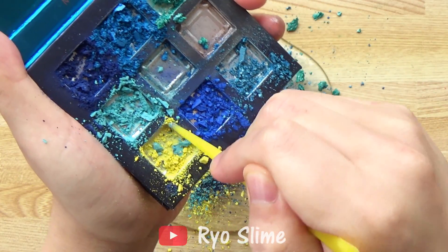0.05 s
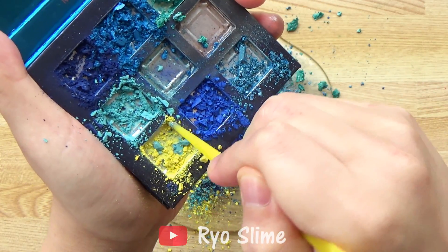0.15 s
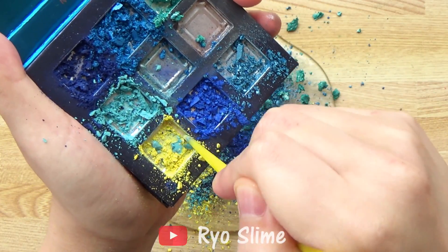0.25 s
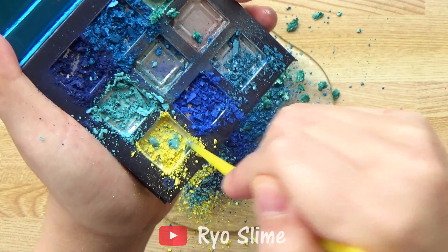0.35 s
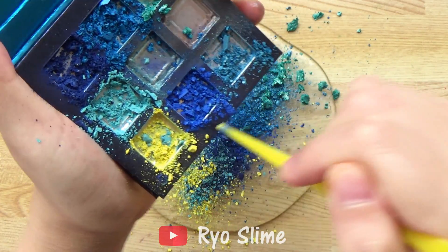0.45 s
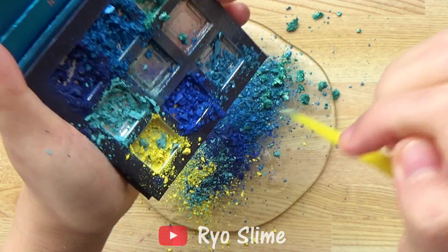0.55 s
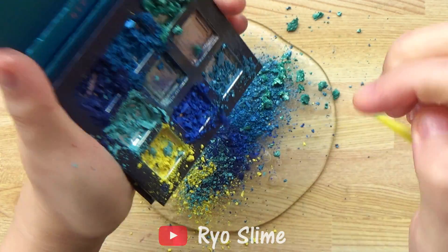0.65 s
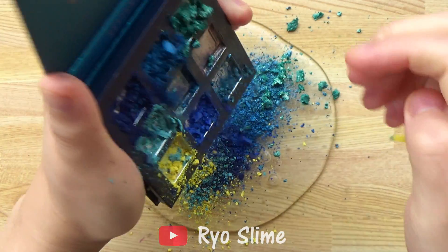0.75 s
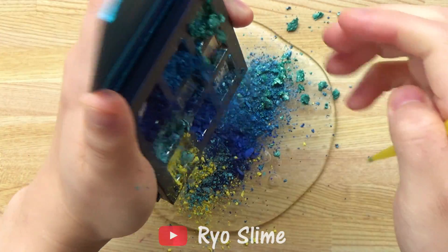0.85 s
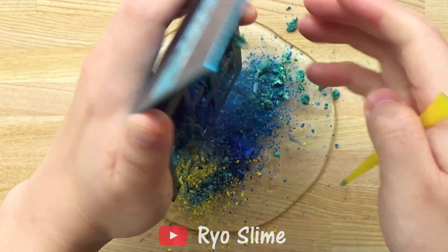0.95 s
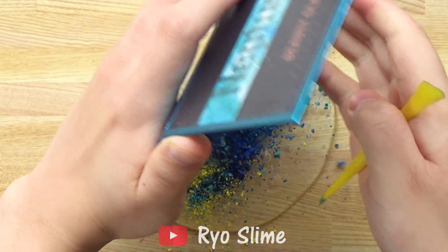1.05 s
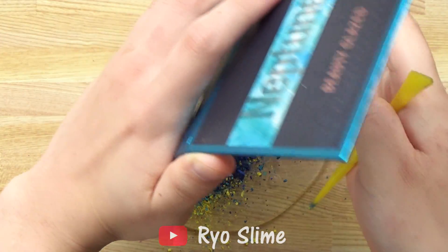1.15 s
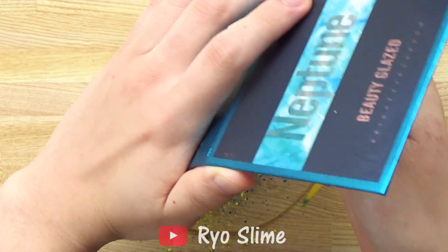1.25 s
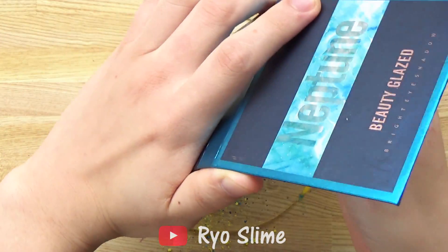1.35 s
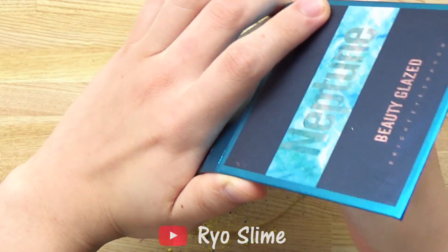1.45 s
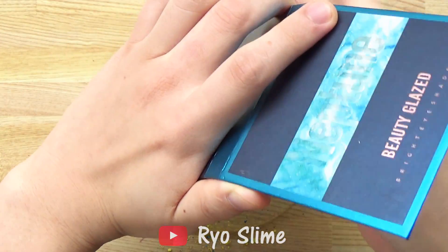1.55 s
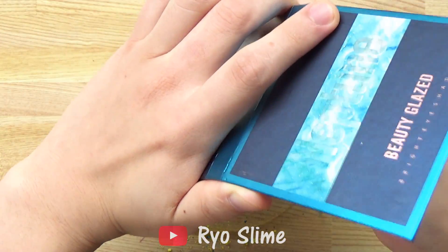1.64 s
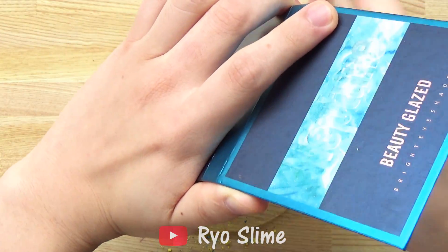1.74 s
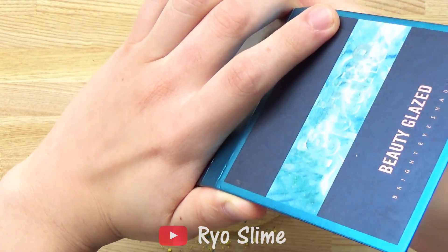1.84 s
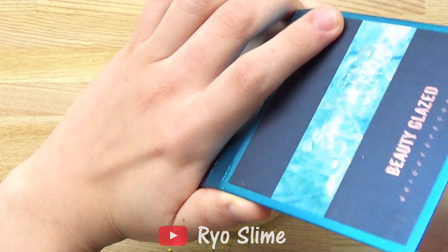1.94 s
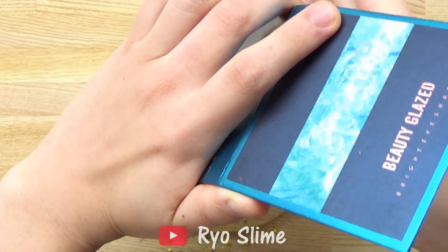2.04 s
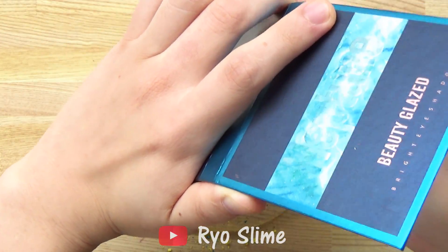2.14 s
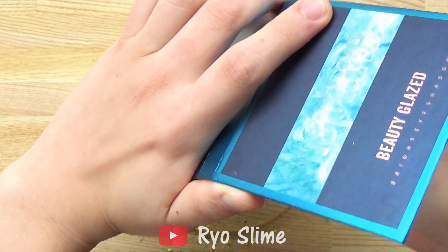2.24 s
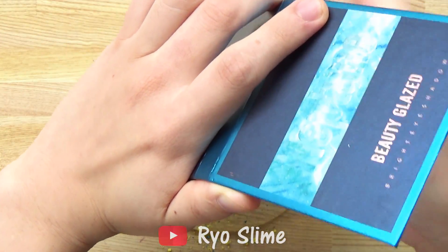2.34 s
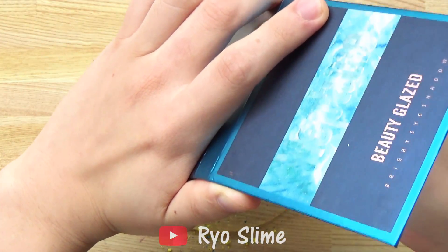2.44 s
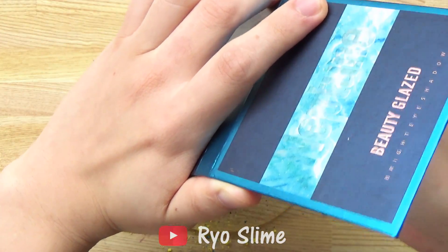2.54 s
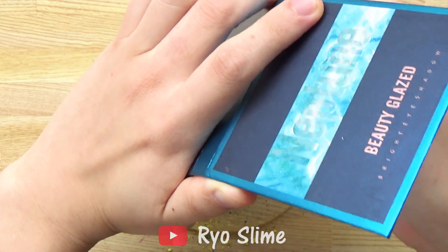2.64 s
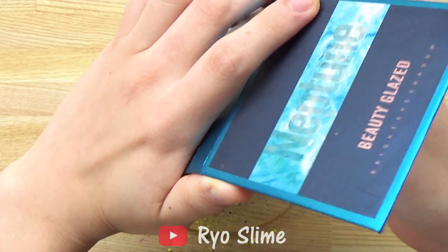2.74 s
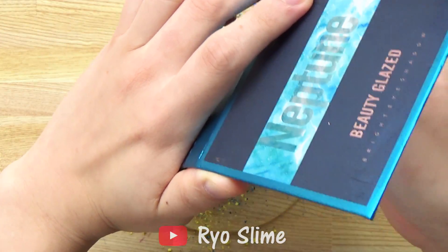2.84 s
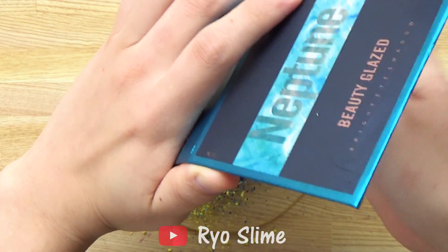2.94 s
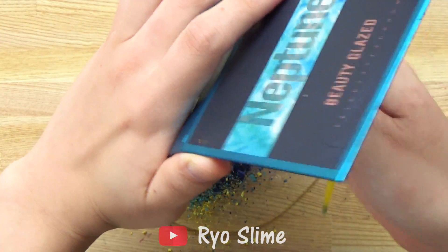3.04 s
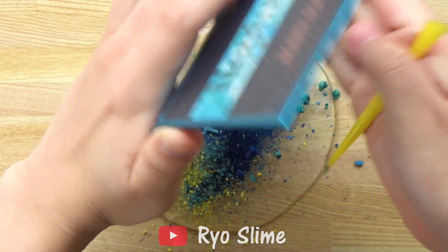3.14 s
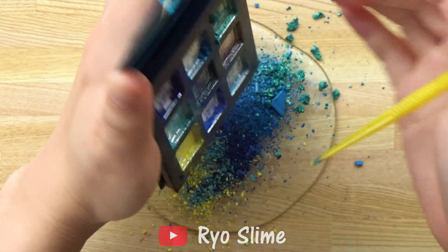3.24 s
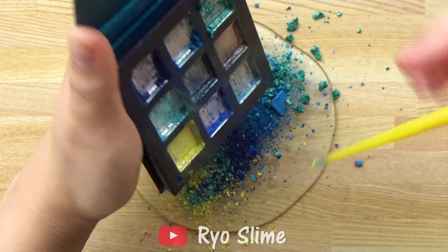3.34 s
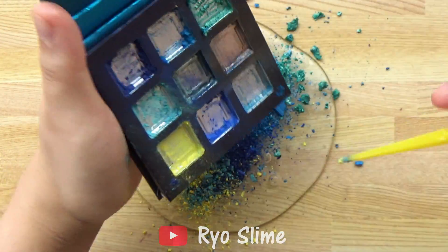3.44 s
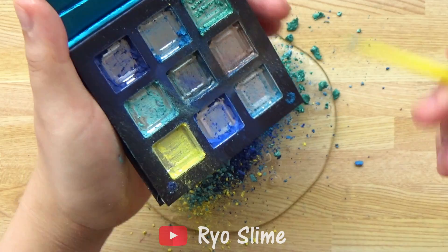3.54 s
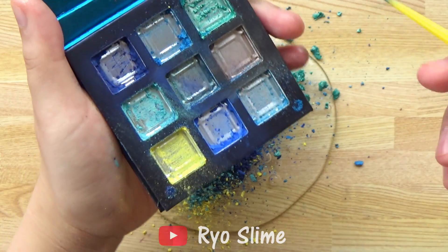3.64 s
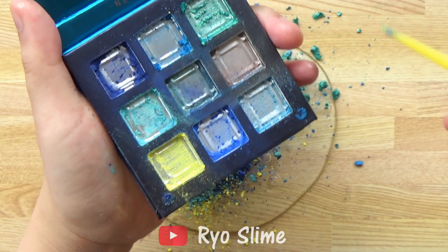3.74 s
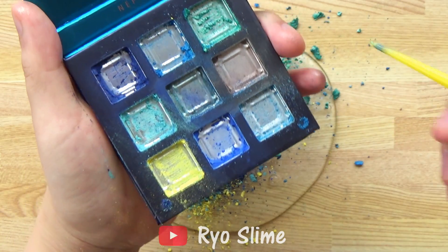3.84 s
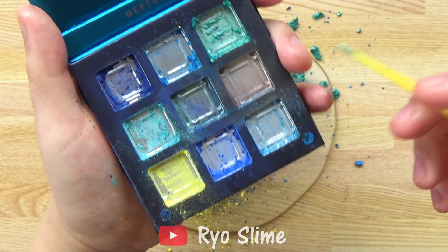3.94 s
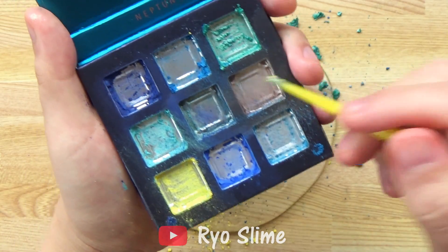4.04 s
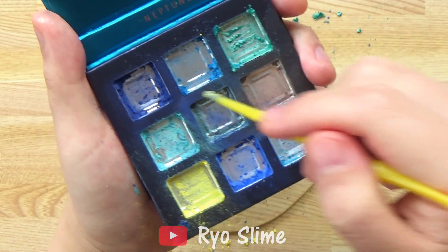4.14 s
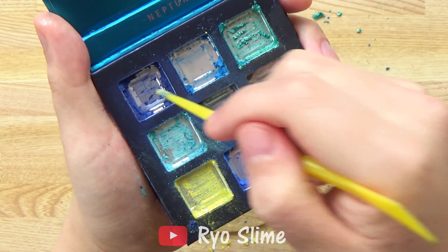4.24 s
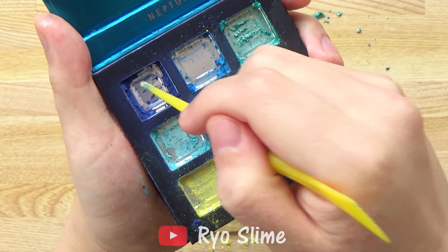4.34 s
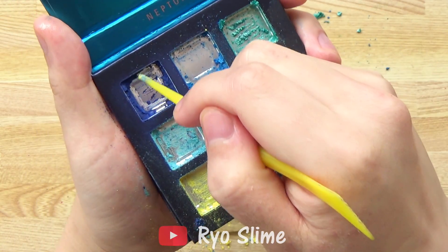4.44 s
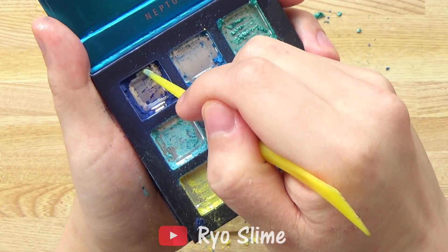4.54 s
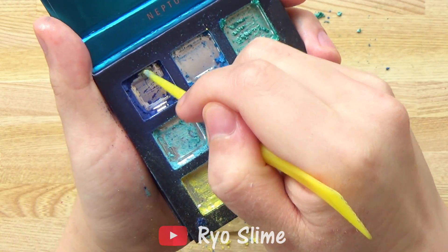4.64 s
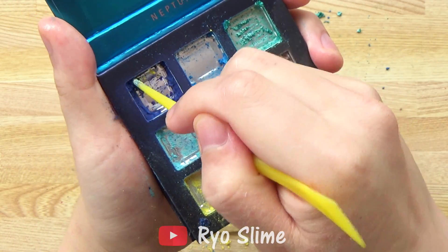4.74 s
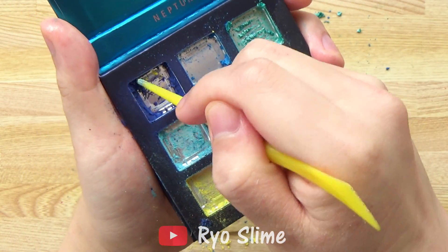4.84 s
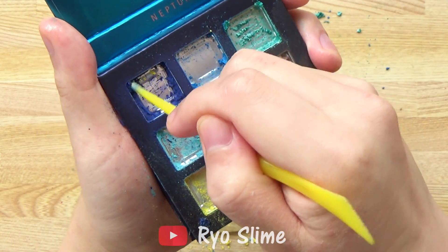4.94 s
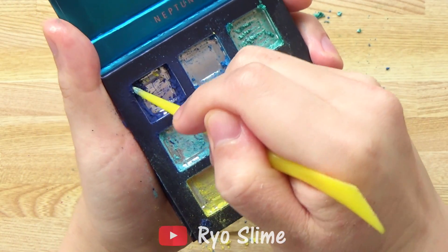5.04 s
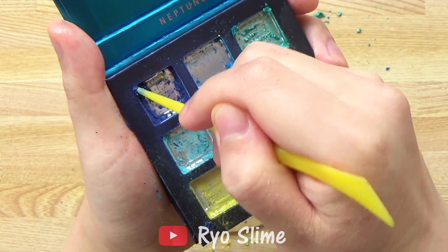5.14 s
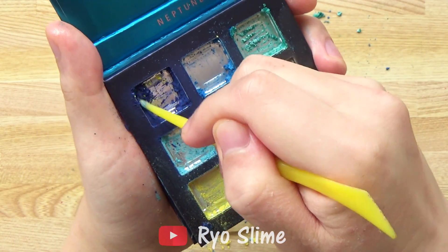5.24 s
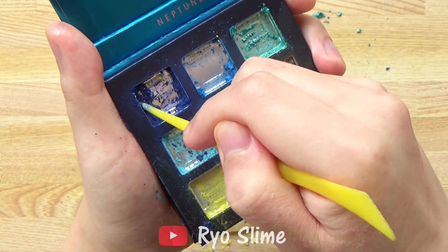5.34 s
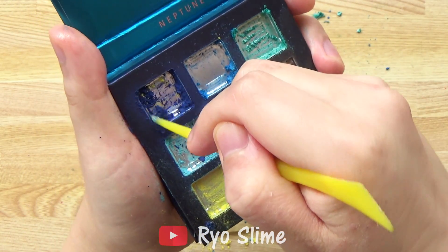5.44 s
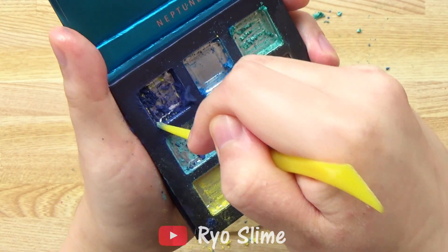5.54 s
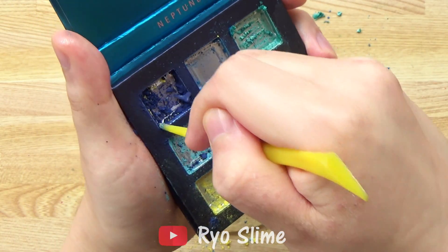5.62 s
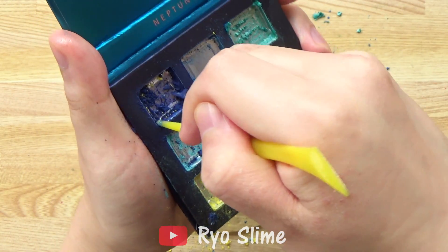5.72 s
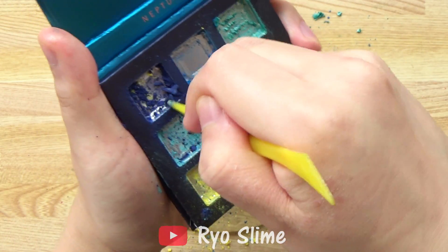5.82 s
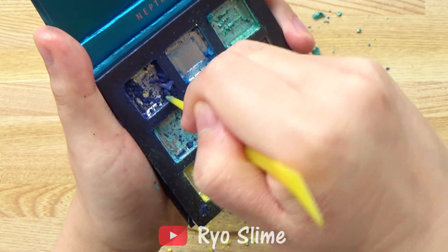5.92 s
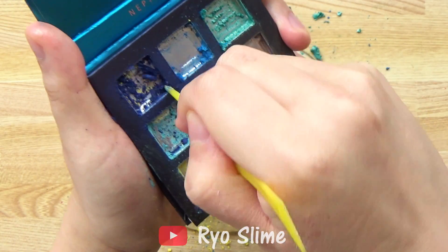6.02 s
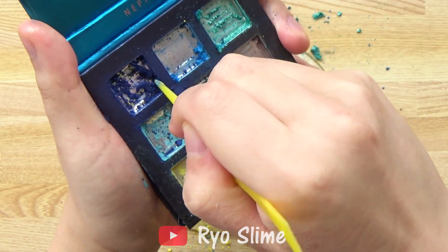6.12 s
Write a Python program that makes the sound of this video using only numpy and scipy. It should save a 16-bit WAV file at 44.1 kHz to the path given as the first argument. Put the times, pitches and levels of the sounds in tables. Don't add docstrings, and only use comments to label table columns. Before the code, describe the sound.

Very close stereo, quiet room with low handling rumble. A thin plastic pick scrapes and snaps pressed powder and flicks the tray. The case is swung over and slapped about eleven times in quick regular rhythm, soft at first, then loud, each crack followed by a short hiss of crumbs. Near silence follows, with faint skin rubbing, then dull thuds, a brief rattling metal pan knock, and gritty digging ending in hard snaps.

```python
import sys
import numpy as np
from scipy import signal
from scipy.fft import rfft, irfft, next_fast_len
from scipy.io import wavfile
from scipy.ndimage import uniform_filter1d

SR = 44100
rng = np.random.default_rng(int(sys.argv[2]) if len(sys.argv) > 2 else 0)


def materialize(psi):
    bounded = np.clip(np.atleast_2d(psi).T, -1, 1)
    quanta = np.round(bounded * 32767).astype(np.int16)
    wavfile.write(sys.argv[1], SR, quanta)


def natural_amplitude(level_db):
    exponent = np.asarray(level_db, float) / 20
    return 10 ** exponent


N = 272538

# (time [s], peak [dB], bright part over peak [dB], push [dB], crumbs shaken out [dB])
SLAPS = [(1.5163, -16, -16, -32, -36.5), (1.659, -21, -8.5, -28.5, -35.5),
         (1.8083, -26, -14.5, -29.5, -36.5), (1.9615, -7.5, -5, -21, -38), (2.117, -4.5, -8, -22, -38),
         (2.2717, -3, -3.5, -21.5, -34), (2.43, 1, -10, -21.5, -36), (2.5775, 1.5, -10, -21, -34),
         (2.7325, -6, -2.5, -20, -31.5), (2.8968, -6, -5, -22, -34.5), (3.0535, -9.5, -5, -19.5, -42.5)]
# (time [s], peak [dB], bright part over peak [dB])
LATE_FINGERS = [
    (1.816, -18, -12),
    (1.985, -31, -5.5),
    (2.147, -21, -14),
    (2.291, -31.5, -3),
    (2.737, -16, -4),
    (2.757, -30, 3),
    (3.089, -32, 2),
]
# (frequency [Hz], width [Hz], level [dB])
SLAP_BODY = [(380, 110, -3), (730, 73, 1), (1276, 180, 1.5), (1834, 180, -0.5), (2913, 400, -5),
             (3790, 1300, -15)]
# (frequency [Hz], width [Hz], level [dB])
SLAP_EDGE = [(4720, 880, -11), (6750, 450, -3.5), (7850, 570, 2.5), (9270, 980, 3.5), (11900, 1900, -9.5),
             (13500, 1500, -10)]
SLAP_LOW_DB = [5, 5, 6, 4, 4, 2, 9, 1, 11, 15, 4]
# (second [dB], third [dB], fourth [dB], fifth [dB], sixth [dB])
SLAP_SPOTS = [(5.0, -1.0, 6.0, 3.0, -1.0), (4.0, -5.0, -6.0, -3.0, 11.0), (5.0, 4.0, 7.0, -1.0, 1.0),
              (6.0, -3.0, 2.0, 1.0, 2.0), (3.0, 2.0, -0.0, -2.0, 4.0), (4.0, -2.0, -1.0, 1.0, 3.0),
              (1.0, -2.0, 4.0, 1.0, -4.0), (0.0, -3.0, -1.0, 2.0, 5.0), (3.0, 4.0, 3.0, 1.0, 2.0),
              (4.0, -4.0, 2.0, 2.0, 7.0), (-7.0, 3.0, 0.0, 1.0, -5.0)]
# (lowest [dB], second [dB], third [dB], fourth [dB], upper ones [dB])
SLAP_EDGE_SPOTS = [(-2.0, 0.0, -7.0, -7.0, 5.0), (-2.0, 14.0, 1.0, 3.0, 1.0), (10.0, 10.0, 5.0, 3.0, 7.0),
                   (2.0, 6.0, 4.0, -3.0, 9.0), (1.0, 3.0, 2.0, 7.0, 5.0), (1.0, 5.0, 2.0, 2.0, -0.0),
                   (6.0, 4.0, -2.0, 4.0, 8.0), (6.0, 6.0, -2.0, -4.0, 5.0), (2.0, 6.0, 4.0, -0.0, 4.0),
                   (11.0, 10.0, 1.0, -1.0, -2.0), (1.0, 1.0, -2.0, 4.0, -1.0)]
# (lead [s], frequency [Hz], t60 [s], signed size [1])
SLAP_MID = [(.07, 15, .3, .14), (-.0003, 230, .014, .85), (-.0003, 74, .06, .95)]
# (lead [s], frequency [Hz], t60 [s], signed size [1])
SLAP_SIDE = [(.045, 8, .5, .26), (-.0012, 44, .085, 1.25), (-.03, 26, .2, -.18)]
# (lead [s], frequency [Hz], t60 [s], signed size [1])
SWING_MID = [(0.0347, 28, .12, -0.91), (0.011, 49, 0.089, 0.74)]
# (lead [s], frequency [Hz], t60 [s], signed size [1])
SWING_SIDE = [(.03, 22, .14, 1.3)]
# (frequency [Hz], width [Hz])
TABLE_NULLS = [(540, 170), (1010, 80), (2150, 110)]
# (frequency [Hz], density [dB per Hz])
DULL_TAIL = [(120, -16), (200, -8.5), (281, 6.5), (454, -3.5), (646, -2), (849, -6.5), (1160, -5),
             (2170, -12), (4500, -36.5), (5850, -51.5), (9900, -120)]
# (frequency [Hz], density [dB per Hz])
CRUMB_TAIL = [(1760, -33.5), (3000, -10.5), (3590, -8.5), (4980, -7.5), (5460, -8), (7800, 1.5),
              (10400, -2.5), (12400, -10), (15000, -17.5), (16000, -27), (16500, -61.5)]

# (time [s], peak [dB], bright part over peak [dB], push [dB], powder [dB])
SNAPS = [
    (0.067, -26.5, -27, -27.5, -49),
    (0.2236, -10.5, -32, -28.5, -47),
    (5.244, -24, -33, -30, -40),
    (5.5212, -5.5, -31, -22, -45),
    (5.7968, -4.5, -24, -12.5, -42),
    (5.8338, -13, -22, -35, -36),
    (6.0042, -3, -40, -19, -36),
    (6.0063, -8, -30, -24, -45),
    (6.11, -12.5, -30, -25.5, -46),
    (6.12, -14, -28, -36.5, -46),
]
# (time [s], peak [dB], bright part over peak [dB], powder [dB])
TICKS = [(0.0055, -33, -11, -47), (0.493, -39, -13, -62), (0.5535, -27, -25, -60), (.807, -36, -25, -65),
         (0.828, -35, -14, -56), (.854, -32, -25, -64), (0.8765, -20, -22, -62), (.905, -33, -28, -64),
         (.92, -27, -28, -62), (.932, -32, -22, -64), (.951, -27, -28, -58), (0.9615, -11, -18.5, -42),
         (0.964, -3, -22, -42), (1.002, -27, -25, -58), (1.051, -33.5, -7, -50), (1.104, -30, -28, -60),
         (1.126, -23, -18, -62), (1.135, -24, -25, -62), (1.161, -25.5, -16, -67), (1.209, -26, -16, -46),
         (3.738, -39, -28, -68.5), (3.847, -30, -20, -66), (4.6935, -16, -18, -48), (5.272, -27, -10, -49),
         (5.328, -29, -1, -48), (5.5525, -24, -22, -49), (5.563, -11, -12, -46), (5.7188, -19, -32, -60)]
# (time [s], peak [dB], push [dB])
THUDS = [(4.025, -31, -29.5), (4.056, -39, -34), (4.082, -35.5, -37), (4.145, -32, -32), (4.253, -32, -31),
         (4.552, -31.5, -34), (4.606, -19.5, -38), (4.897, -14.5, -48), (4.969, -33.5, -40),
         (5.118, -22.5, -34.5), (5.437, -25, -39), (5.461, -28.5, -31.5), (5.467, -20, -28.5),
         (5.5203, -7, -36)]
# (frequency [Hz], width [Hz], level [dB])
TICK_BODY = [(785, 67, -3), (1480, 300, -3.5), (1830, 200, -1), (2220, 270, -15.5), (3040, 380, -10.5)]
# (frequency [Hz], width [Hz], level [dB])
SNAP_BODY = [(611, 130, 1.5), (1124, 380, -3), (1837, 270, -1), (2380, 220, -7.5), (2930, 120, -26),
             (3890, 1200, -20)]
# (frequency [Hz], width [Hz], level [dB])
THUD_BODY = [(208, 150, -2.5), (400, 200, 0), (592, 230, 0), (990, 340, -2), (1335, 400, -11),
             (1880, 140, -15)]
# (frequency [Hz], width [Hz], level [dB])
PICK_EDGE = [(4500, 1600, -1), (6700, 1400, 2.5), (7930, 1100, 0.5), (11000, 4000, -17)]
# (lowest [dB], second [dB], third [dB], upper ones [dB])
TICK_SPOTS = [(-6.0, -3.0, -5.0, 15.0), (9.0, -5.0, -5.0, 7.0), (-3.0, -3.0, 5.0, -11.0),
              (-6.0, 3.0, -3.0, -1.0), (6.0, 1.0, -8.0, -0.0), (9.0, -3.0, -9.0, -3.0),
              (-2.0, -7.0, -3.0, -1.0), (13.0, 3.0, -2.0, -7.0), (-1.0, -0.0, 2.0, 4.0),
              (3.0, -6.0, -2.0, 9.0), (-10.0, 5.0, -4.0, -6.0), (-2.0, 9.0, 7.0, 4.0),
              (-2.0, 5.0, 3.0, 4.0), (-6.0, 3.0, 12.0, 0.0), (9.0, -15.0, -14.0, 1.0),
              (-13.0, -1.0, -4.0, -1.0), (-12.0, -11.0, 1.0, 4.0), (-13.0, 2.0, 7.0, 1.0),
              (-9.0, 3.0, -13.0, -4.0), (-7.0, -7.0, -6.0, 0.0), (13.0, -5.0, -4.0, 1.0),
              (12.0, -4.0, -3.0, -2.0), (10.0, 0.0, -3.0, -3.0), (9.0, -7.0, -10.0, 4.0),
              (-13.0, -8.0, -7.0, 12.0), (-7.0, 8.0, 5.0, 7.0), (-12.0, -13.0, -1.0, 11.0),
              (7.0, -1.0, 1.0, 5.0)]
# (lowest [dB], second [dB], third [dB], upper ones [dB])
SNAP_SPOTS = [(7.0, -0.0, -3.0, -10.0), (3.0, -0.0, 2.0, -8.0), (4.0, -1.0, -3.0, -4.0),
              (4.0, -3.0, -3.0, -0.0), (1.0, -3.0, 2.0, 1.0), (-1.0, 5.0, -3.0, -7.0),
              (2.0, 1.0, -3.0, -4.0), (2.0, 1.0, -3.0, -4.0), (1.0, 1.0, -3.0, -5.0),
              (3.0, 1.0, -10.0, -8.0)]
# (lowest [dB], upper ones [dB])
TICK_EDGE_SPOTS = [(14.0, -8.0), (6.0, 0.0), (-3.0, 6.0), (-4.0, -8.0), (0.0, 5.0), (-1.0, -6.0),
                   (-2.0, 2.0), (6.0, -5.0), (-3.0, -12.0), (-4.0, -5.0), (5.0, -16.0), (5.0, -3.0),
                   (7.0, -3.0), (-0.0, -5.0), (-1.0, -5.0), (4.0, -12.0), (-0.0, -7.0), (5.0, -4.0),
                   (-3.0, 5.0), (-3.0, -7.0), (-3.0, 3.0), (-14.0, 7.0), (15.0, -3.0), (-4.0, 6.0),
                   (-3.0, 5.0), (8.0, -3.0), (8.0, -4.0), (10.0, -10.0)]
# (lead [s], frequency [Hz], t60 [s], signed size [1])
PICK_MID = [(.0003, 309, 0.011, -1.58), (-0.004, 95, 0.026, 1.1)]
# (lead [s], frequency [Hz], t60 [s], signed size [1])
PICK_SIDE = [(-.001, 155, .03, 0.4)]
# (frequency [Hz], density [dB per Hz])
PICK_TAIL = [(1760, -26.5), (3000, -0.5), (4700, -8), (8380, -4), (9660, -11.5), (15100, -15), (16200, -26),
             (16500, -50)]

# (time [s], peak [dB], tail [dB])
KNOCK = [
    (4.6772, -17, -48),
    (4.6834, -0.5, -24),
    (4.6918, -9, -40),
    (4.6937, 0.5, -36),
    (4.6976, 0, -41),
    (4.7015, -14, -50),
]
# (frequency [Hz], level [dB], t60 [s])
PAN = [(392, -10, 0.1), (493, -2.5, 0.31), (574, 0, 0.42), (788, 1, 0.29), (870, -3, 0.25), (995, -2, 0.25),
       (1060, -3, 0.3), (1270, -7, 0.2), (1645, -6, 0.066), (1830, -10, .25), (2370, -17, .15),
       (3590, -24, .2), (4040, -21, .15), (4780, -18, .15)]
# (frequency [Hz], density [dB per Hz])
KNOCK_TAIL = [(150, -40), (250, -25), (350, -5), (499, -2), (687, -8), (1030, -1.5), (1440, -19),
              (1820, -20), (2470, -27), (4160, -16), (14000, -45)]

# (time of most force [s], level [dB], rise per 30 dB [s], fall per 30 dB [s])
STROKES = [(.001, -41, .01, .07), (.04, -46, .03, .03), (.2215, -29, .025, .02), (.243, -25.5, .018, .08),
           (.262, -27, .04, .09), (.288, -32, .04, .05), (.325, -42, .04, .025), (.99, -38, .06, .14),
           (1.134, -36.5, .1, .08), (1.22, -41, .14, .09), (6.115, -38, .012, .03), (6.14, -45, .04, .09)]
# (time of most force [s], level [dB], rise per 30 dB [s], fall per 30 dB [s])
DIGS = [
    (.001, -34, .01, .11),
    (.06, -38, .04, .025),
    (4.681, -25, .035, .01),
    (5.25, -38.5, .045, .13),
    (5.47, -44.5, .11, .04),
    (5.519, -33, .025, .01),
    (5.527, -31.5, .008, .17),
    (5.795, -27, .025, .01),
    (5.804, -27.5, .008, .14),
]
# (time of most force [s], level [dB], rise per 30 dB [s], fall per 30 dB [s])
SHOVES = [
    (6.002, -34, .02, .01),
    (6.016, -30, .012, .16),
    (6.116, -31, .015, .03),
    (6.135, -38, .03, .1),
]
# (frequency [Hz], density [dB per Hz])
SCRAPE = [(180, -47), (300, -22.5), (725, -9.5), (1210, -9.5), (1870, 1.5), (2400, -8), (3200, -5),
          (3890, -14), (7440, -22.5), (11900, -36), (16000, -50.5)]
# (frequency [Hz], density [dB per Hz])
DIG = [(180, -42), (300, -19.5), (562, 3.5), (840, -6.5), (1180, -3), (1680, -12.5), (1940, -6),
       (2760, -15.5), (7850, -20), (14000, -42.5)]

# (time [s], level [dB], duration [s], cavity frequency [Hz])
SLIDES = [(.99, -52, .07, 4300), (1.2, -53, .1, 4350), (1.29, -51, .07, 4650), (1.44, -56, .07, 4650),
          (3.39, -58, .005, 3030), (3.5, -56, .03, 2960), (4.02, -61, .005, 4400), (4.29, -59, .09, 4500),
          (4.49, -60, .015, 4900), (4.49, -60, .015, 5500), (3.6, -62, .02, 2900), (4.5, -60, .1, 3680),
          (.64, -64, .12, 9900), (3.58, -70, .14, 9000), (3.88, -69, .2, 7000), (6.117, -52, .04, 3950)]

# (time [s], level [dB], duration [s])
SIFTING = [(.005, -57, .05), (3.15, -76, .08), (4.85, -76, .36), (.48, -65, .47), (1.0, -52, .005),
           (1.08, -64, .36), (1.2, -58, .05), (1.3, -55, .06), (1.51, -38, .005), (3.29, -65, .02),
           (3.39, -69, .005), (3.47, -63, .04), (3.55, -73, 1.08), (3.85, -67, .005), (4.04, -71, .06),
           (4.67, -50, .005), (5.25, -58, .08), (5.36, -67, .14), (5.51, -55, .005), (5.805, -46, .045),
           (5.88, -63, .06), (6.0, -58, .004), (6.11, -58, .06)]
# (frequency [Hz], density [dB per Hz])
HISS = [(2060, -35), (3500, -10), (4780, -8.5), (6780, -4), (7380, 2), (9380, -1.5), (10000, -1),
        (10600, -2.5), (15100, -9), (16200, -15), (16500, -40)]

# (time [s], rumble of grip [dB], rustle of motion [dB])
HANDS = [(0, -31, -41), (.14, -34.5, -63), (.27, -32.5, -52), (.4, -34, -58), (.79, -35, -49.5),
         (1.05, -31.5, -49.5), (1.46, -31.5, -48.5), (1.62, -37, -68), (3.02, -35, -70), (3.2, -42, -66),
         (3.56, -41, -59.5), (4.44, -38, -52.5), (4.6, -31, -49.5), (4.77, -37, -48), (4.96, -37.5, -61.5),
         (5.25, -38, -54), (5.7, -38.5, -54), (6.18, -38, -47)]
# (frequency [Hz], density [dB per Hz])
RUMBLE = [(8.8, -23), (15, 13.5), (32, 8), (103, 2.5), (167, -6.5), (242, -10.5), (324, -16.5), (405, -17),
          (636, -38.5), (700, -25), (910, -42.5), (1540, -120)]
# (frequency [Hz], density [dB per Hz])
RUSTLE = [(240, -31.5), (400, -1.5), (580, 0.5), (871, -6), (1040, -6.5), (1150, -8.5), (1720, -9.5),
          (3060, -19.5), (5070, -35), (7000, -33), (9100, -55), (15400, -120)]

# (frequency [Hz], side minus mid [dB])
WIDTH = [(60, -1.5), (150, -4.5), (380, -2), (950, -5), (2380, -4), (4400, 1.5), (15000, 2.5)]
# (low edge [Hz], high edge [Hz], opening level [dB])
GATE = [(2700, 5000, -75), (5000, 17000, -78)]


def slaps():
    s, db, bright_db, push_db, hiss_db = np.transpose(SLAPS)
    touches = [row[:3] for row in SLAPS] + LATE_FINGERS
    touch_s, touch_db, touch_bright_db = np.transpose(touches)
    body_spots = [(low, *row) for low, row in zip(SLAP_LOW_DB, SLAP_SPOTS)] + [(0,) * 6] * len(LATE_FINGERS)
    edge_spots = SLAP_EDGE_SPOTS + [(0,) * 5] * len(LATE_FINGERS)
    body = crack(touch_s, touch_db, SLAP_BODY, 0.0021, 1.42, gain_db=-1.5, apart=.3, sharp=7.5, loose=.45,
                 spots_db=body_spots)
    body = fade(body, .00004) / (.00004 * SR)
    edge = crack(touch_s, touch_db + touch_bright_db, SLAP_EDGE, 0.0008, 0.99, gain_db=10., apart=0.55,
                 sharp=1.5, loose=.7, spots_db=edge_spots)
    air = push(s, push_db + 15.0, SLAP_MID, SLAP_SIDE)
    dull_db = hiss_db + 2.5 + .3 * db
    dull = swell(clicks(s, dull_db), 0.0043, .035) * coloured(DULL_TAIL, grain_db=3.5, wide_db=-1.0)
    crumbs = coloured(CRUMB_TAIL, grain_db=2.2)
    bright = swell(clicks(s, hiss_db), 0.006, 0.026) * crumbs
    later_swell = swell(clicks(s, hiss_db - 6.5), 0.014, 0.012) * band(crumbs, 6900., 9200.)
    return off_table(body + air) + dull + (edge + bright + later_swell) * natural_amplitude([[.8], [-.8]])


def swing():
    return off_table(push(np.array([1.515]), -9, SWING_MID, SWING_SIDE))


def picks():
    body = 0
    for rows, peaks, burst_s, gain_db, sharp, spots in (
            (TICKS, TICK_BODY, .0015, 9., 4.5, TICK_SPOTS),
            (SNAPS, SNAP_BODY, .0014, 10., 6., SNAP_SPOTS),
            (THUDS, THUD_BODY, .002, 13., 5., None)):
        s, db = np.transpose(rows)[:2]
        body = body + crack(s, db, peaks, burst_s, 0.94, gain_db, apart=0.15, sharp=sharp,
                            spots_db=spots, loose=.6)
    body = fade(body, .00003) / (.00003 * SR)
    # time [s], then edge, push, dull tail and hiss [dB]
    contacts = [(s, db + bright, -44, powder + 4.0, powder) for s, db, bright, powder in TICKS]
    contacts += [(s, db + bright, shove, powder, powder - 22) for s, db, bright, shove, powder in SNAPS]
    contacts += [(s, -60, shove, -54, -65) for s, db, shove in THUDS]
    s, edge_db, push_db, dull_db, hiss_db = np.transpose(contacts)
    edge = crack(s, edge_db, PICK_EDGE, 0.0012, 1.3, gain_db=12.5, apart=0.45, sharp=1.2, loose=.8,
                 spots_db=TICK_EDGE_SPOTS + [(3, 3)] * len(SNAPS + THUDS))
    dull = swell(clicks(s, dull_db), 0.0019, 0.026) * coloured(DULL_TAIL, grain_db=3.0, wide_db=-5.5)
    bright = swell(clicks(s, hiss_db), 0.0018, 0.021) * coloured(PICK_TAIL, grain_db=1.5)
    air = push(s, push_db + 7.5, PICK_MID, PICK_SIDE)
    return (body + edge + dull + bright) * natural_amplitude([[-.9], [.9]]) + air


def knock():
    s, db, tail_db = np.transpose(KNOCK)
    strengths = rng.normal(0, 1.5, (len(s), len(PAN)))
    pan = 0
    for k, (hz, mode_db, t60) in enumerate(PAN):
        blows = clicks(s, db + mode_db + strengths[:, k] - 16.5)
        damped = ring(blows, hz, 0.037)
        pan = pan + damped + natural_amplitude(-22.5) * ring(blows, hz, t60)
    pan = -swell(band(pan, 300., 9000.), .00004, .0001) / (.0001 * SR)
    tail = swell(clicks(s, tail_db), 0.0016, 0.043) * coloured(KNOCK_TAIL, grain_db=3.5, wide_db=-1.0)
    return pan * natural_amplitude([[-.6], [.6]]) + tail


def strokes():
    drag, dig, shove = [spells(tent(s, db, 0, rise_s, fall_s) for s, db, rise_s, fall_s in rows)
                        for rows in (STROKES, DIGS, SHOVES)]
    drag = drag * coloured(SCRAPE, grain_db=3.2, wide_db=-4.5)
    grit = coloured(DIG, grain_db=3.2, wide_db=-5.5)
    soft_grit = band(band(grit, 350., 4200.), 350., 4600.)
    return (drag + dig * grit + shove * soft_grit) * natural_amplitude([[-1.3], [1.3]])


def slides():
    out, t = np.zeros((2, N)), np.arange(N) / SR
    lowpass = signal.butter(1, 180, fs=SR, output="sos")
    slow = rms_one(signal.sosfilt(lowpass, rng.standard_normal((2, 2, N))))
    for s, db, lasts, hz in SLIDES:
        near = slice(int((s - .15) * SR), int((s + lasts + .15) * SR))
        since = t[near] - s
        turn = 2 * np.pi * (hz + 600 * since / 2) * since
        level = natural_amplitude(tent(s, db, lasts, .07, .07)[near])
        out[:, near] += level * (slow[0][:, near] * np.cos(turn) + slow[1][:, near] * np.sin(turn))
    return out


def sifting_powder():
    powder = coloured(HISS, grain_db=1.7)
    hiss = 0
    for k, edges in enumerate(((3000, 6500), (6500, 9000), (9000, 12000), (12000, 17000))):
        hiss = hiss + natural_amplitude(2.5 * drift(4)) * band(powder, *edges) * (-1) ** k
    level = spells(tent(s, db, lasts, .03, .05) for s, db, lasts in SIFTING)
    return (level + natural_amplitude(-91)) * hiss * natural_amplitude([[-1.1], [1.1]])


def hands():
    grip_db, motion_db = in_time(HANDS)
    rumble = natural_amplitude(grip_db + 3.6 * drift(9.9)) * coloured(RUMBLE)
    rustle = natural_amplitude(motion_db + 1.2 * drift(9)) * coloured(RUSTLE, grain_db=1.5)
    return (rumble + rustle) * natural_amplitude([[-1.1], [1.1]])


def crack(times, db, peaks, burst_s, damping, gain_db, apart, sharp=1.53, spots_db=None, loose=1):
    mid, side = np.sign(rng.standard_normal((2, N)))
    first = clicks(times, db + gain_db)
    ears = np.array([mid + apart * side, mid - apart * side])
    bursts = loose * fade(first, burst_s) * ears - sharp * first
    if spots_db is None:
        spots_db = 1.5 * rng.standard_normal((len(times), 6))
    return resonate(bursts, peaks, damping, times, np.array(spots_db))


def resonate(x, peaks, damping, times, spots_db):
    order = np.argsort(times)
    passed = np.searchsorted(times[order] * SR - 1, np.arange(N))
    latest = order[np.maximum(passed - 1, 0)]
    out = 0
    for k, (hz, width, db) in enumerate(peaks):
        r = np.exp(-np.pi * width * damping / SR)
        b = (1 - r * r) / 2 * np.array([1, 0, -1]) * natural_amplitude(db) * (-1) ** k
        spot = spots_db[:, min(k, spots_db.shape[1] - 1)]
        drive = x * natural_amplitude(spot)[latest]
        out = out + signal.lfilter(b, [1, -2 * r * np.cos(2 * np.pi * hz / SR), r * r], drive)
    return out


def push(times, db, mid_modes, side_modes):
    mid, side = [sum(size * ring(clicks(times - lead, db), hz, t60) for lead, hz, t60, size in modes)
                 for modes in (mid_modes, side_modes)]
    return swell(np.array([mid + side, mid - side]), 0.00013, 0.00046) / (0.00039 * SR)


def off_table(x):
    for hz, width in TABLE_NULLS:
        x = signal.lfilter(*signal.iirnotch(hz, hz / width, SR), x)
    return x


def ring(x, hz, t60):
    r, w = natural_amplitude(-60 / (t60 * SR)), 2 * np.pi * hz / SR
    return signal.lfilter([0, np.sin(w)], [1, -2 * r * np.cos(w), r * r], x)


def clicks(times, db):
    out = np.full(N, 1e-18)
    np.add.at(out, np.round(np.asarray(times) * SR).astype(int), natural_amplitude(db))
    return out


def fade(x, seconds):
    return signal.lfilter([1], [1, -np.exp(-1 / (seconds * SR))], x)


def swell(x, rise_s, fall_s):
    return fade(fade(fade(x, rise_s), rise_s), fall_s) / (rise_s * SR) ** 2


def spells(levels_db):
    return swell(sum(natural_amplitude(db) for db in levels_db), 0.0013, 0.0029) / (0.0031 * SR)


def tent(s, db, hold_s, rise_s, fall_s):
    t = np.arange(N) / SR
    return db - 30 * np.maximum(0, np.maximum((s - t) / rise_s, (t - s - hold_s) / fall_s))


def coloured(spectrum, grain_db=0., wide_db=0.):
    size = next_fast_len(N)
    hz = np.arange(size // 2 + 1) * SR / size
    grains = rng.standard_normal((2, N)) * natural_amplitude(grain_db * drift(330))
    gain = natural_amplitude(at_hz(spectrum, hz)) * (hz > spectrum[0][0]) * (hz < spectrum[-1][0])
    side_gain = gain * natural_amplitude(at_hz(WIDTH, hz) + wide_db)
    mid = irfft(rfft(grains[0], size) * gain, size)[:N]
    side = irfft(rfft(grains[1], size) * side_gain, size)[:N]
    return np.array([mid + side, mid - side]) / np.sqrt(np.mean(mid ** 2))


def drift(rate):
    r = np.exp(-2 * np.pi * rate / SR)
    return rms_one(signal.lfilter([1], [1, -2 * r, r * r], rng.standard_normal(N + SR))[SR:])


def band(x, low_hz, high_hz):
    return signal.sosfilt(signal.butter(2, [low_hz, high_hz], "band", fs=SR, output="sos"), x)


def rms_one(x):
    return x / np.sqrt(np.mean(x ** 2) + 1e-20)


def in_time(rows):
    s, *columns = np.transpose(rows)
    return [np.interp(np.arange(N) / SR, s, c) for c in columns]


def at_hz(points, hz):
    point_hz, point_db = np.array(points).T
    return np.interp(np.log(hz + 1), np.log(point_hz), point_db)


def scene():
    return slaps() + swing() + picks() + knock() + strokes() + slides() + sifting_powder() + hands()


def ports(x):
    size = next_fast_len(N)
    hz = np.arange(size // 2 + 1) * SR / size
    turn = .75 / (1 + (3900 / (hz + 1)) ** 8)
    return irfft(rfft(x, size) * np.exp(1j * turn * [[1], [-1]]), size)[:, :N]


def gate(x):
    size = next_fast_len(N)
    hz = np.arange(size // 2 + 1) * SR / size
    spectrum, out = rfft(x, size), x
    for low_hz, high_hz, open_db in GATE:
        share = np.clip((hz - low_hz) / 400, 0, 1) - np.clip((hz - high_hz) / 400, 0, 1)
        part = irfft(spectrum * share, size)[:, :N]
        level = np.sqrt(np.abs(uniform_filter1d(np.mean(part ** 2, axis=0), size=600)))
        out = out - part * (1 - np.minimum(1, level / natural_amplitude(open_db)) ** 2.)
    return out


def top_cut(x):
    return signal.sosfilt(signal.butter(12, 16900, fs=SR, output="sos"), x)


def record(dry):
    heard = gate(ports(dry))
    rounded = .99 * heard / (1 + np.abs(heard) ** 4) ** .25
    mix = signal.sosfilt(signal.butter(8, 16300, fs=SR, output="sos"), rounded)
    return top_cut(mix)


dry = scene()
out = record(dry)
materialize(out)
```